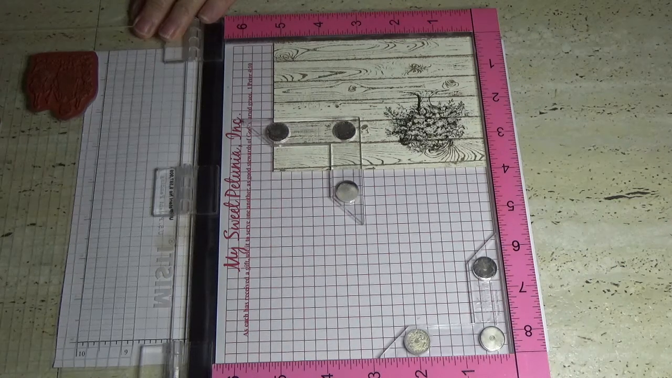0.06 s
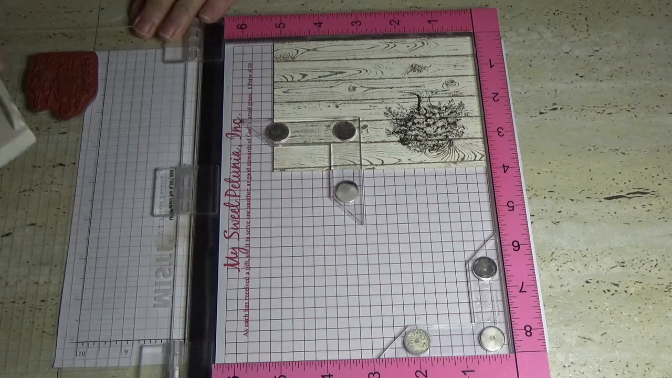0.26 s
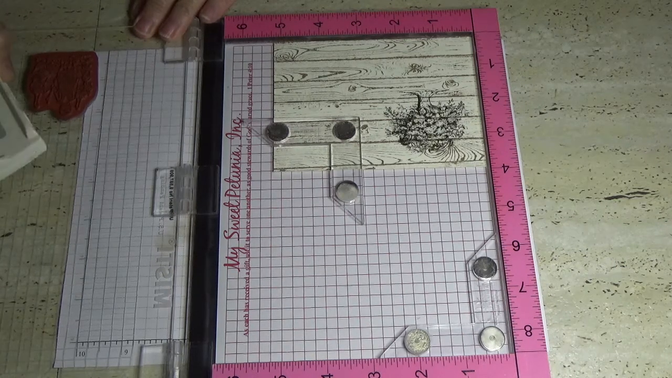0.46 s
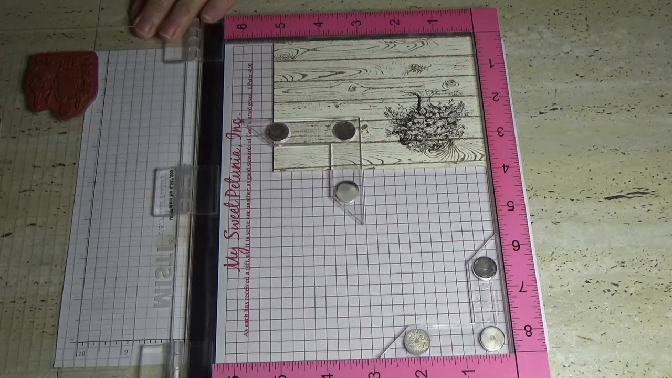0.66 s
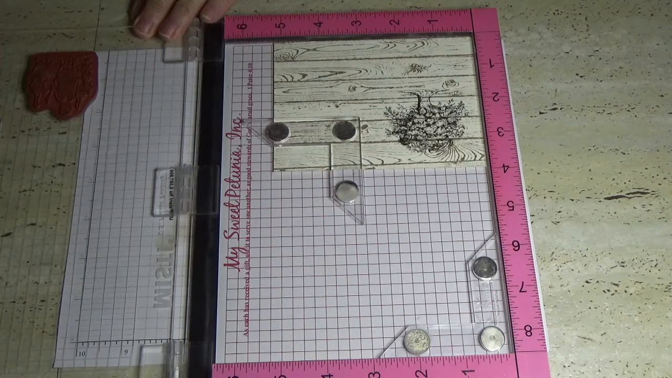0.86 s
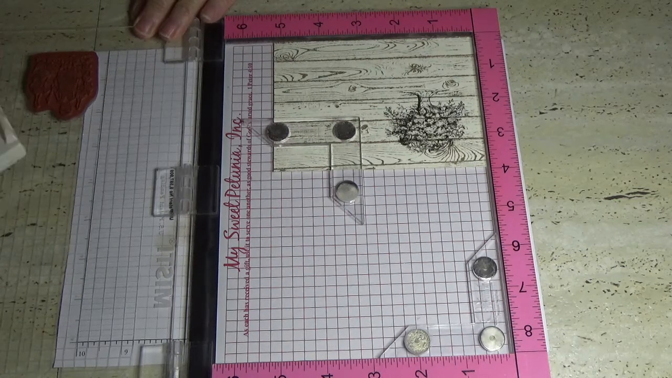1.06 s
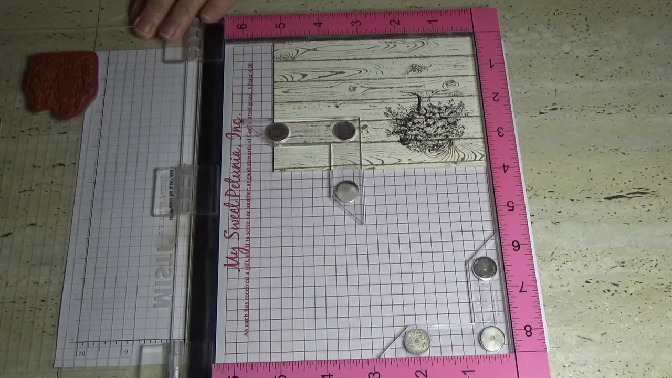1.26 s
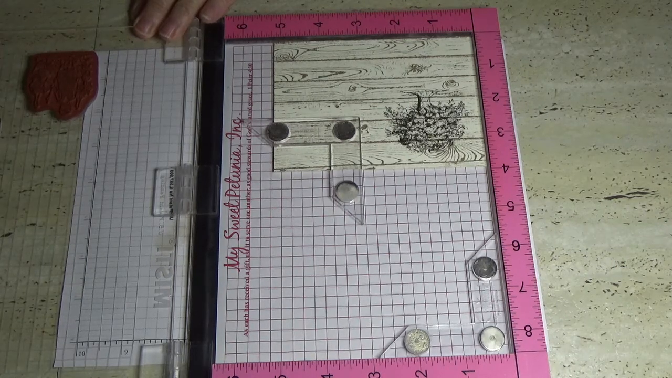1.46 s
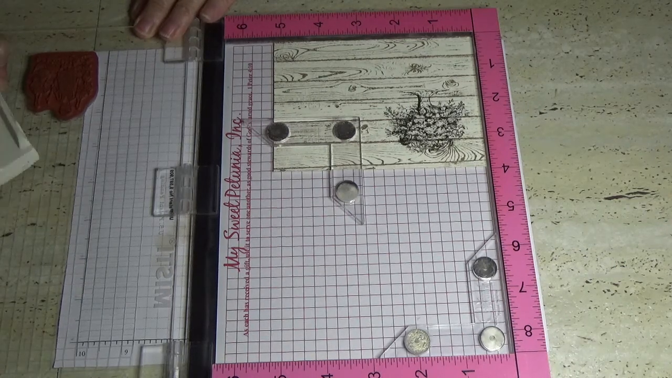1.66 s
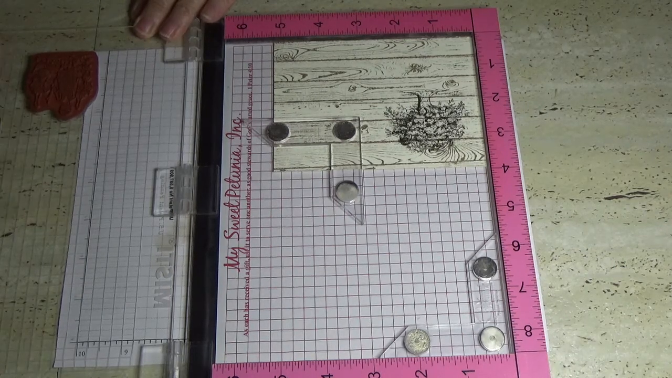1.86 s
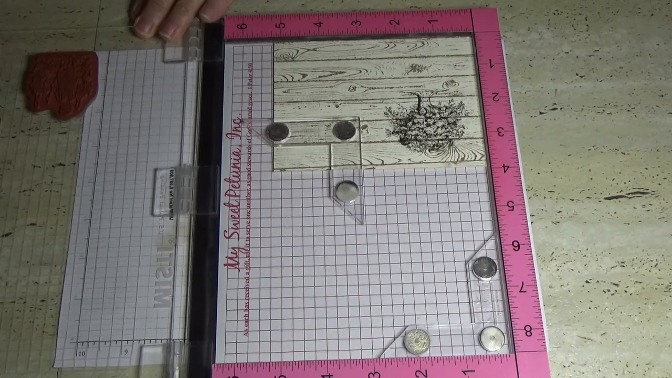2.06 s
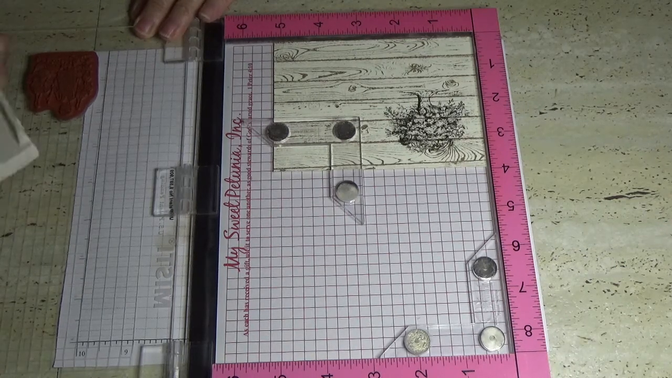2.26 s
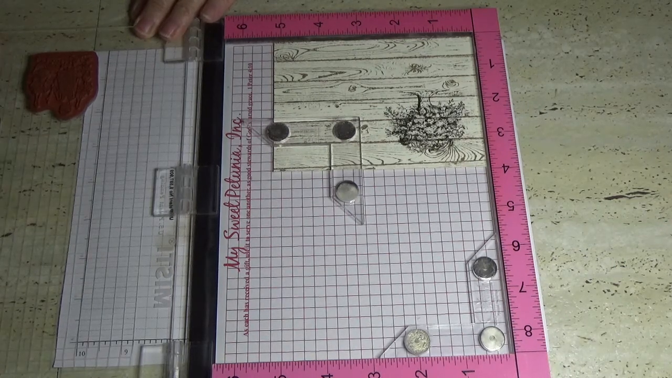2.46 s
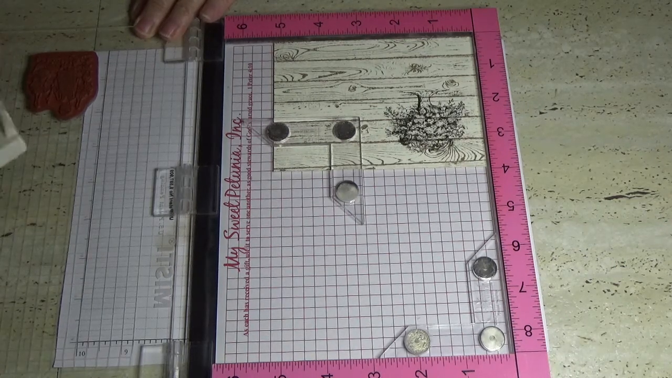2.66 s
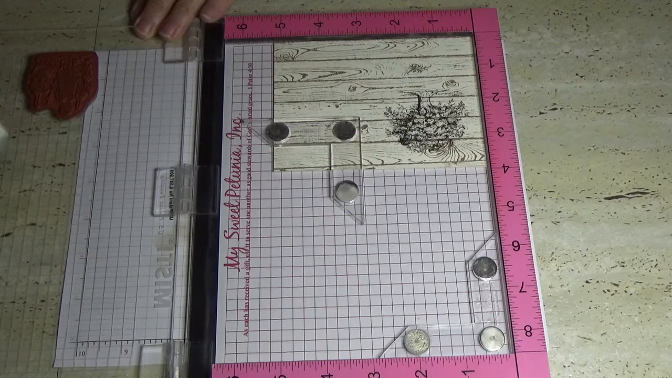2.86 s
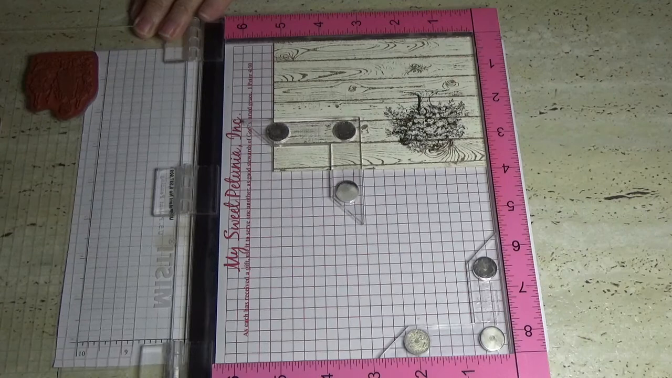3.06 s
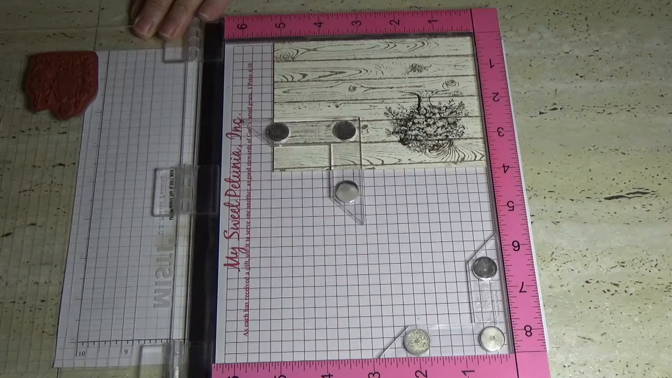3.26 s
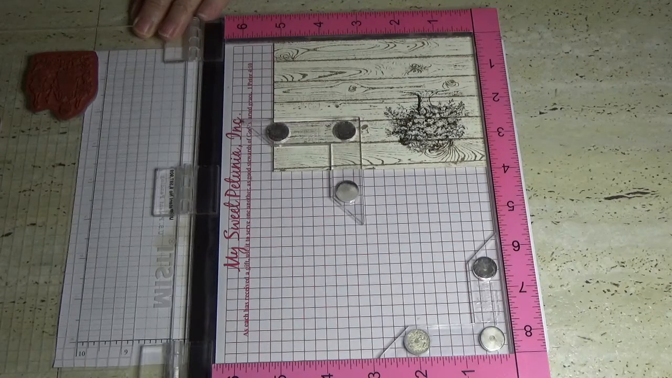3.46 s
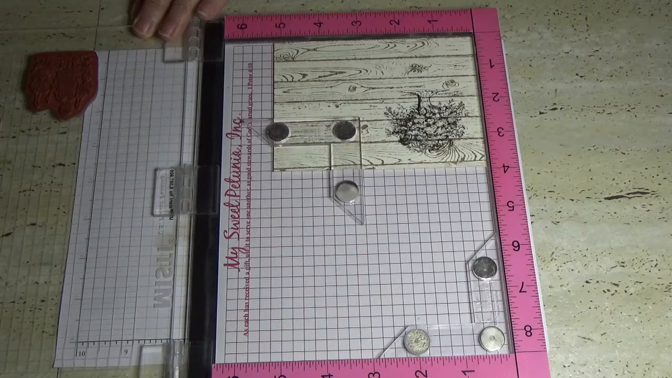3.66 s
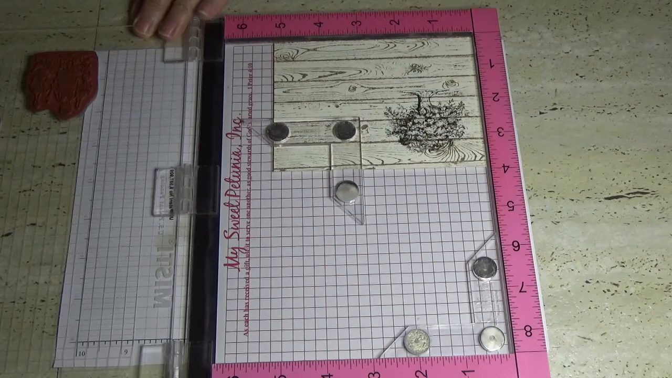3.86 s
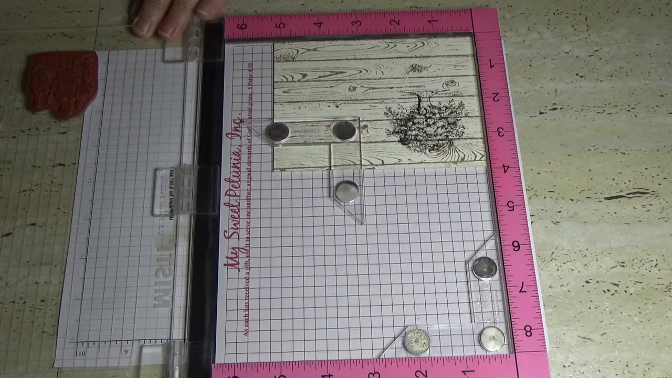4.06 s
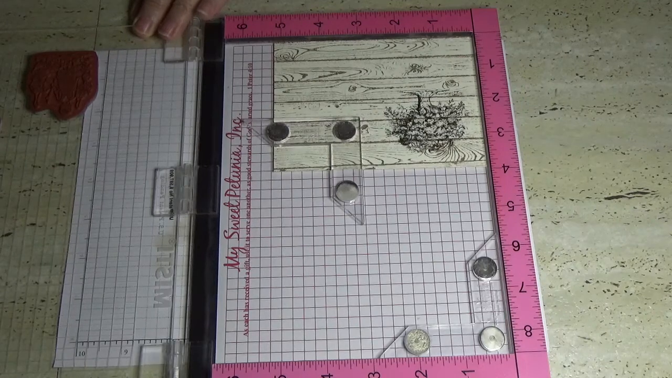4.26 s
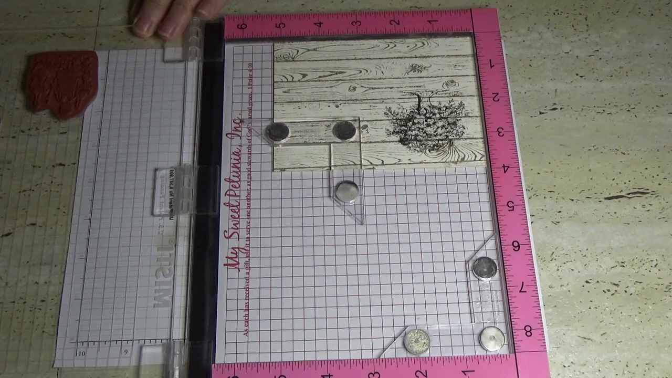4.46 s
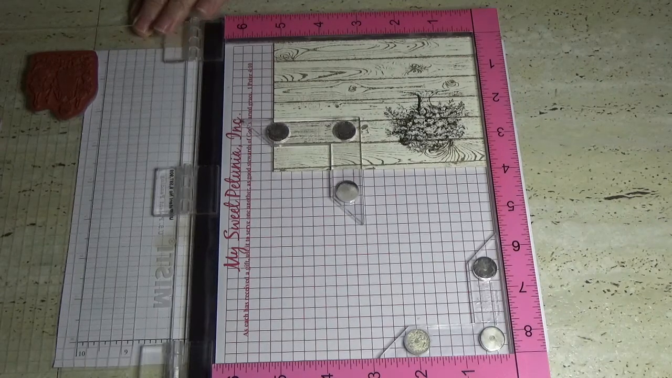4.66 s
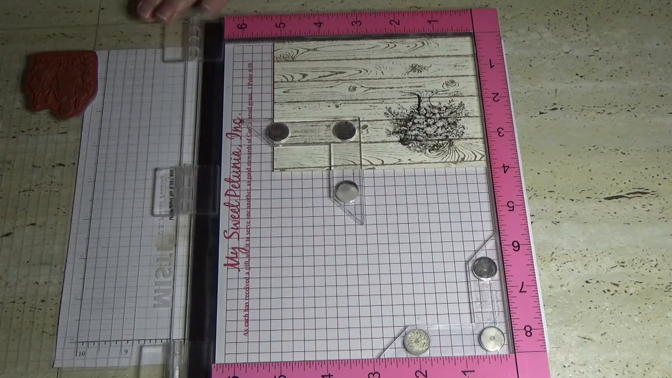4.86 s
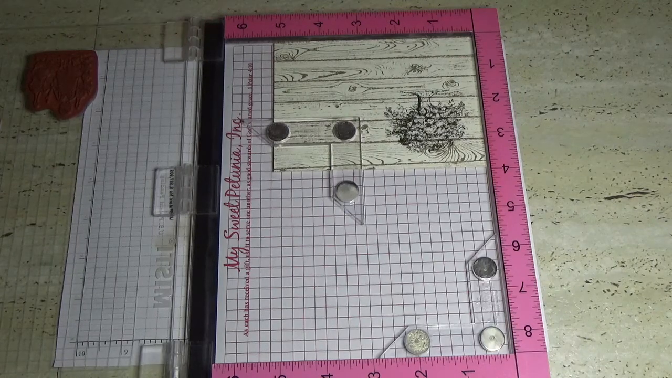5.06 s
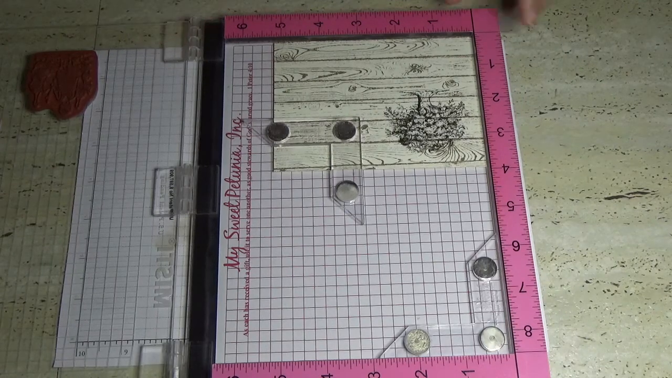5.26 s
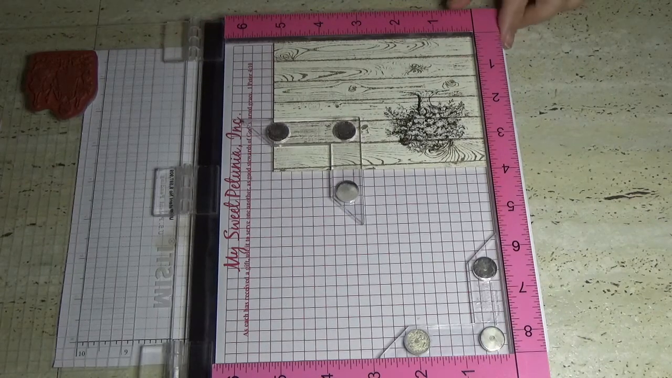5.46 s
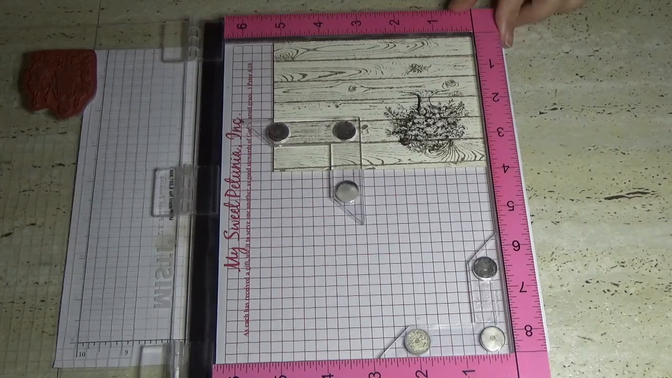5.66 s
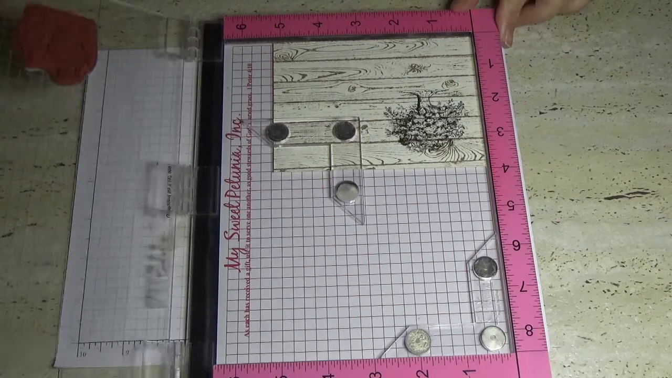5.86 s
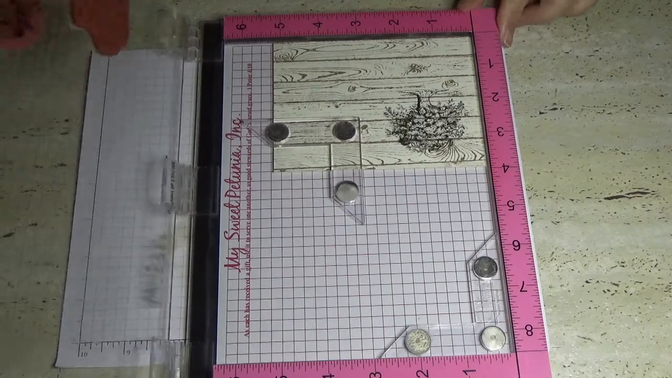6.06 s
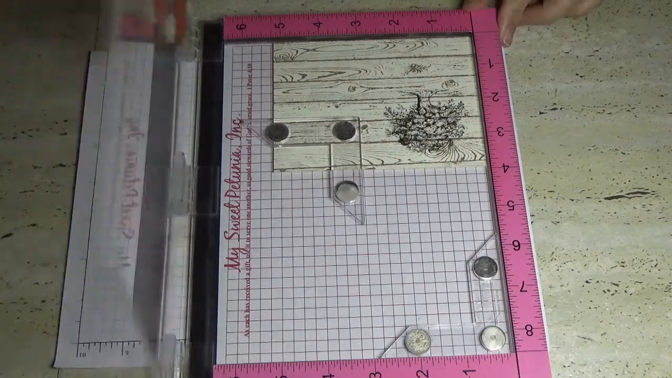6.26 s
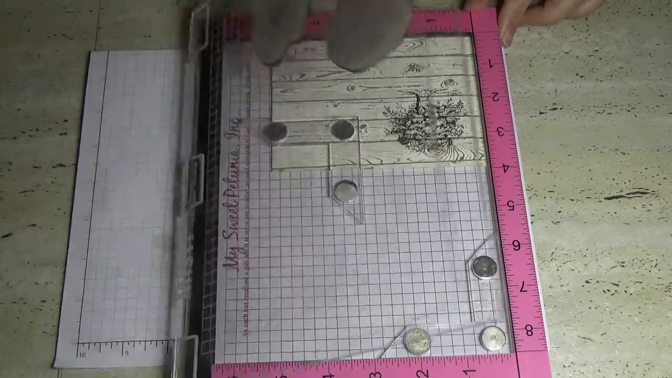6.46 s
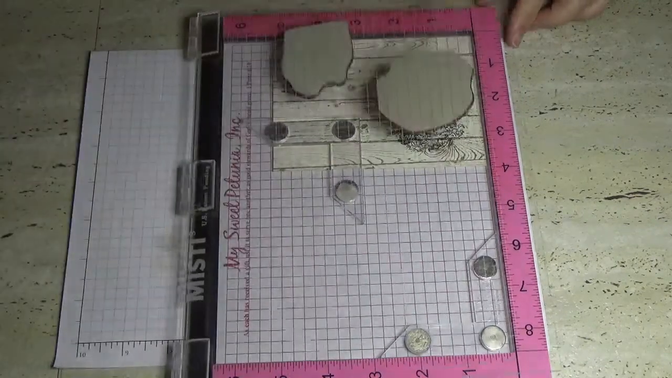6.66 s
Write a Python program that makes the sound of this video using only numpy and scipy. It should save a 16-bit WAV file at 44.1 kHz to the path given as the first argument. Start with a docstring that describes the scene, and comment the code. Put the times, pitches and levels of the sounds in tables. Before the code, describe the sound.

Close up in a small room, a plastic ink pad strikes a rubber stamp five times, about twice every 1.2 seconds, each crack booming through the table. Quieter hollow clacks follow as it pulls free. It is set down with a knock, a hand brushes faintly, small clicks follow, then a hinge creaks in a short raspy buzz. Soft hiss and faint hum lie beneath.

```python
"""In a small room, a plastic ink pad is tapped five times onto a rubber stamp on the open lid of a press.
Each tap cracks and shakes the table by modal vibration; the sticky pad pulls free with a hollow clack.
The pad is put down, fingers click on the press, and its hinge creaks by stick-slip friction as the lid
is swung shut. Blows ring damped modes over a noise burst; the creak is a train of ticks in resonators.
A decaying-noise echo answers them, over air hiss, a faint mains hum and a brushing hand."""
import sys
import numpy as np
from scipy import signal
from scipy.fft import rfft, irfft, next_fast_len
from scipy.io import wavfile

SR = 44100
rng = np.random.default_rng(int(sys.argv[2]) if len(sys.argv) > 2 else 0)


def master(y):
    """Save y as 16-bit WAV."""
    cut = np.clip(np.atleast_2d(y).T, -1, 1)
    pcm = np.round(cut * 32767)  # scale
    wavfile.write(sys.argv[1], SR, pcm.astype(np.int16))


N = 295911   # length of the scene in samples


def from_db(db):
    """Level definition: amplitude ratio of a level in dB."""
    return 10 ** (np.asarray(db) / 20)


def rms_one(x):
    """Normalisation to unit root-mean-square amplitude."""
    return x / np.sqrt(np.mean(x ** 2) + 1e-20)


def fade(t, t60):
    """Exponential damping: a loss of 60 dB in each t60."""
    return from_db(-60 * t / t60)


def at_hz(points, hz):
    """Spectral interpolation on a logarithmic frequency axis."""
    points = np.array(points)
    return np.interp(np.log(np.maximum(hz, 1)), np.log(points[:, 0]), points[:, 1])


def coloured(x, spectrum):
    """Linear filtering: a gain in dB applied at each frequency."""
    length = x.shape[-1]
    size = next_fast_len(length, real=True)
    gain = from_db(at_hz(spectrum, np.fft.rfftfreq(size, 1 / SR)))
    return irfft(rfft(x, size) * gain, size)[..., :length]


def band(x, low_hz, high_hz):
    """Band-pass filtering between two edges."""
    sos = signal.butter(2, [low_hz, high_hz], "band", fs=SR, output="sos")
    return signal.sosfilt(sos, x)


def add(track, s, sound):
    """Superposition: mix a sound into the track at time s."""
    start = int(s * SR)
    track[..., start:start + sound.shape[-1]] += sound[..., :N - start]


# spread of diffuse sound between two microphones: f/Hz, side re mid level/dB
STEREO_SPREAD = [(50, -20), (130, -13), (300, -7), (1000, -5.5), (3000, -5.5), (10000, -8.5)]


def diffuse(size):
    """Diffuse field: stereo white noise, alike in the bass and wider in the treble."""
    mid, side = rng.standard_normal((2, size))
    return mid + coloured(side, STEREO_SPREAD) * [[1], [-1]]


# edges of the five registers of a plastic knock, thud to crack: f/Hz
REGISTER_EDGES = [110, 430, 850, 1500, 4500, 12500]
PIVOT_HZ = 1100   # brightness tilts a blow about this frequency
# selectors that pick out one register
THUD, KNOCK, RING, CLACK, CRACK = np.eye(len(REGISTER_EDGES) - 1)


def octaves_above_pivot():
    """Logarithmic pitch scale: the middle of each register in octaves from the pivot."""
    edges = np.log2(np.array(REGISTER_EDGES) / PIVOT_HZ)
    return (edges[:-1] + edges[1:]) / 2


def knocks(events, voice, modes, crack_db, rise_s):
    """Modal excitation: each blow rings damped modes over a crack; harder contact tilts it to the treble.

    Events: t/s, level/dB, brightness/(dB/octave), pitch/semitones, crack t60/s.
    Returned rows: left, right, and what goes out into the room."""
    out = np.zeros((3, N))
    t = np.arange(SR // 6) / SR
    mode_hz, mode_db, mode_t60 = np.transpose(modes)[:, :, None]
    rise = 1 - np.exp(-t / rise_s)
    for s, blow_db, brightness, semitones, crack_t60 in events:
        # damped modes, each slightly varied in pitch and strength
        pitch = 2 ** (semitones / 12)
        detune, strength, phase = rng.standard_normal((3, len(modes), 1))
        height = from_db(mode_db + 1.5 * strength) * fade(t, mode_t60)
        angle = 2 * np.pi * (pitch * mode_hz * (1 + 0.015 * detune) * t + phase)
        rings = (height * np.sin(angle)).sum(0)

        burst = rise * fade(t, crack_t60)
        crack = from_db(crack_db) * diffuse(len(t)) * burst
        # summed over all directions the crack has the even spectrum of one click
        all_round = np.linalg.norm(crack[0]) * (burst == burst.max())
        blow = rings * rise + np.vstack([crack, all_round])

        register_db = blow_db + np.array(voice) + brightness * octaves_above_pivot()
        registers = zip(REGISTER_EDGES, REGISTER_EDGES[1:], register_db)
        for k, (low_hz, high_hz, db) in enumerate(registers):
            part = band(blow, low_hz, high_hz)
            # the level of a register holds over its first 20 ms
            part = part / np.std(part[:, :SR // 50], axis=1, keepdims=True)
            polarity = (-1) ** k   # neighbouring registers are opposed
            add(out, s, polarity * from_db(db) * part)
    return out


# pad meets stamp, twice grazing it first: t/s, level/dB, brightness/(dB/octave),
# clack of the rim/dB, pitch shift/semitones, weight of the hand/dB
TAPS = [(0.3398, -51.5, -3, -12, 0.48, 8), (.3443, -32, 1, 1, -0.31, -3.5),
        (1.0022, -33, 0.28, 4, -0.31, 0), (1.6328, -27, -1.5, -2, -0.4, -2),
        (2.216, -50.5, -4.5, -4, -0.32, 4), (2.2254, -29.5, 0.43, 2.5, 0.28, -4),
        (2.732, -31, 0.3, 1.5, 0.96, 6)]
# modes of the pad case: f/Hz, relative level/dB, t60/s
PAD_MODES = [(237, -19.5, 0.061), (308, -15.5, 0.1), (377, -16, 0.054), (543, -8.5, 0.049),
             (656, -3, 0.035), (814, -12, 0.11), (926, 1.5, 0.012), (1034.6, -7.5, 0.13), (1097, 6, 0.025),
             (1363, -6, 0.018), (1730, -1, 0.021), (2280, -8.5, 0.022), (2400, 8.5, 0.013),
             (3267, -4, 0.024), (3825, -16, 0.093), (4474, 0.5, 0.01)]
# share of a tap in thud, knock, ring, clack and crack: relative level/dB
TAP_VOICE = [-13, -4.5, -1.5, 1, -3]
TAP_CRACK_T60_S = 0.013


def pad_taps():
    """Impact of the pad case on the stamp: short and hard, clacking on its rim, thudding under a heavy hand."""
    blows = []
    for s, db, brightness, clack_db, semitones, weight_db in TAPS:
        level_db = db + clack_db * CLACK + weight_db * THUD
        blows.append((s, level_db, brightness, semitones, TAP_CRACK_T60_S))
    return knocks(blows, TAP_VOICE, PAD_MODES, crack_db=17, rise_s=0.00097)


# deep table modes, in close pairs that beat (sway, then drum): lower f/Hz, upper f/Hz, t60/s
TABLE_PAIRS = [(58, 70.5, .42), (133, 149, .22)]
SWAY_DB, DRUM_DB = -11, -8.5   # amplitude of each mode against tap level plus hand weight


def table_boom():
    """Beating: a tap sways and drums the table; paired modes start opposed, so the boom swells and throbs."""
    out = np.zeros(N)
    t = np.arange(SR // 2) / SR
    boom = 0
    for (lower_hz, upper_hz, t60), mode_db in zip(TABLE_PAIRS, [SWAY_DB, DRUM_DB]):
        pair = np.sin(2 * np.pi * lower_hz * t) - np.sin(2 * np.pi * upper_hz * t)
        boom = boom + from_db(mode_db) * fade(t, t60) * pair
    for s, db, *_, weight_db in TAPS:
        add(out, s, from_db(db + weight_db) * boom)
    return out


# pad pulls free and rattles in its case: t/s, level/dB, brightness/(dB/octave),
# hollow ring/dB, pitch shift/semitones
LIFTS = [(0.517, -32, 0.8, -1.5, 1.34), (0.6929, -44.5, -2, -6, 3.5), (1.165, -33, -0.3, -0.5, 0.35),
         (1.39, -45.5, -1.3, -4, 5), (1.808, -34, 1.5, 6, 0.4), (2.389, -49, -4.5, 4, -0.5),
         (2.3977, -39, -1.7, -0.5, 0.87), (2.8268, -41, 2.2, 4.5, 0)]
# share of a lift in thud, knock, ring, clack and crack: relative level/dB
LIFT_VOICE = [-21.5, -15.5, -1, -3, -24.5]
LIFT_CRACK_T60_S = 0.021


def pad_lifts():
    """Sudden release of adhesion: the sticky pad lets go and its case rings hollow in its modes."""
    blows = []
    for s, db, brightness, ring_db, semitones in LIFTS:
        blows.append((s, db + ring_db * RING, brightness, semitones, LIFT_CRACK_T60_S))
    return knocks(blows, LIFT_VOICE, PAD_MODES, crack_db=11, rise_s=0.0006)


# things set down and nudged on the table, the last thump sinking in pitch:
# t/s, level/dB, brightness/(dB/octave), pitch shift/semitones, crack t60/s
BUMPS = [(3.4206, -39, 3.9, .5, 0.013), (3.429, -41.5, 3, 0.6, 0.055), (4.579, -50.5, 1.5, 0, 0.051),
         (4.595, -57.5, -3, .5, 0.043), (5.154, -65, -8, 3, .05), (5.172, -82.5, -16, -2.5, 0.028),
         (5.194, -85.5, -13, -3, .021)]
# modes of the table top under a soft bump: f/Hz, relative level/dB, t60/s
TOP_MODES = [(150.5, 0, 0.054), (190, -11.5, 0.18), (269, -0.5, 0.036), (349, -3, 0.039), (523, 1, 0.13),
             (633, 12.5, 0.013), (834, 0.5, 0.033), (885, -4.5, 0.025), (1360, -7.5, 0.018),
             (1900, -12, 0.028)]
# share of a bump in thud, knock, ring, clack and crack: relative level/dB
BUMP_VOICE = [-3.5, -10, 3, -12, -31]


def table_bumps():
    """Plate modes: soft blows on the table top, whose pitch depends on where they land."""
    return knocks(BUMPS, BUMP_VOICE, TOP_MODES, crack_db=1.0, rise_s=0.00077)


# light clicks and scuffs of fingers and lid on the press: t/s, level/dB,
# brightness/(dB/octave), clack of the frame/dB, crack t60/s
CLICKS = [(3.1022, -79.5, 2.5, 0, 0.03), (4.7677, -60.5, 1.5, -3.5, 0.036), (4.843, -81.5, 4.5, -1, 0.015),
          (5.1636, -66, 2.8, 2.5, 0.021), (5.374, -53, -7, 7, 0.048), (5.5778, -80.5, 6, -29, 0.021),
          (5.68, -60, 2, 1, 0.015), (5.6938, -75, 6.5, -9, 0.019), (5.71, -54.5, -2.5, -5, 0.039),
          (5.719, -54, -4, 3.5, 0.041), (6.1591, -53.5, 2, -3.5, 0.011), (6.2832, -63, 2.5, 0, .01)]
# modes of the press frame and lid: f/Hz, relative level/dB, t60/s
PRESS_MODES = [(831, -15.5, 0.29), (1122, -16, 0.1), (1616, -14.5, 0.088), (2140, -15, 0.063),
               (4550, 8.5, 0.0074), (10460, 5.5, 0.011)]
# share of a click in thud, knock, ring, clack and crack: relative level/dB
CLICK_VOICE = [-28, -11.5, -4, 6.5, 4]


def press_clicks():
    """Impulsive contact: small sharp clicks on the frame and lid, which keep their pitch."""
    blows = []
    for s, db, brightness, clack_db, crack_t60 in CLICKS:
        blows.append((s, db + clack_db * CLACK, brightness, 0, crack_t60))
    return knocks(blows, CLICK_VOICE, PRESS_MODES, crack_db=10, rise_s=0.000096)


def resonate(x, resonances):
    """Parallel resonance: band-pass resonators side by side."""
    out = 0
    for hz, width_hz, db in resonances:
        r = np.exp(-np.pi * width_hz / SR)   # pole radius
        zeros = np.array([1, 0, -1]) * (1 - r * r) / 2
        poles = [1, -2 * r * np.cos(2 * np.pi * hz / SR), r * r]
        out = out + from_db(db) * signal.lfilter(zeros, poles, x + 1e-18)
    return out


# in its long pull the hinge locks into an even buzz (slip rate in Hz, spread of log interval)
STEADY_SLIP_HZ, STEADY_JITTER = 191.7, 0.0028
# the hinge gives way in pulls, each lasting until the next: t/s, level/dB, squeal level/dB,
# first slip rate f/Hz, last slip rate f/Hz, irregularity (standard deviation of log interval)
PULLS = [(5.927, -45.5, -60, 309.3, 397, 0.23),
         (5.957, -45.5, -51, STEADY_SLIP_HZ, STEADY_SLIP_HZ, STEADY_JITTER),
         (6.088, -48, -46, 134.3, 222.8, .025), (6.207, -61, -49.5, 367, 403, 0.3),
         (6.28, -52, -47, 379.4, 337.8, .12)]
# resonances that the hinge excites: f/Hz, width/Hz, relative level/dB
CREAK_BODY = [(710, 340, 10), (1150, 340, 5.5), (1730, 210, 7.5)]
CREAK_RASP = [(2600, 260, -2.5), (3330, 450, 1), (3980, 500, -21), (5370, 840, 7.5), (6600, 290, -10)]
CREAK_SQUEAL = [(4160, 780, 3.5), (5010, 110, 10.5)]
CREAK_FIZZ = [(9250, 1000, 0.54), (9700, 11000, -1.5)]
CREAK_END_S, CREAK_RELEASE_S, CREAK_RELEASE_DB = 6.385, 0.06, 44
BODY_DB, RASP_DB, FIZZ_DB = -3, -1.5, 3   # against the level of a pull
# lost over a pull as the friction eases
BODY_SAG_DB, RASP_SAG_DB, SQUEAL_SAG_DB, FIZZ_SAG_DB = 4.5, 4, 3.5, 19


def hinge(uneven_db):
    """Stick-slip friction: each pull is a train of ticks that starts strong and sags while its rate glides."""
    ticks = np.zeros(N)
    levels_db = np.zeros((4, N))   # body, rasp, squeal, fizz
    sag_db = [BODY_SAG_DB, RASP_SAG_DB, SQUEAL_SAG_DB, FIZZ_SAG_DB]
    starts = [pull[0] for pull in PULLS]
    ends = starts[1:] + [CREAK_END_S]
    for (start, db, squeal_db, first_hz, last_hz, ragged), end in zip(PULLS, ends):
        s = start
        for late, strength in rng.standard_normal((60, 2)):
            if s < end:
                rate = np.interp(s, [start, end], [first_hz, last_hz])
                # quick slips release less each
                ticks[int(s * SR)] = from_db(uneven_db * strength) / np.sqrt(rate)
                s += np.exp(late * ragged) / rate
        first = int(start * SR)
        progress = np.minimum(np.arange(N - first) / SR / (end - start), 1)
        onset_db = np.array([db + BODY_DB, db + RASP_DB, squeal_db, db + FIZZ_DB])
        levels_db[:, first:] = onset_db[:, None] - np.outer(sag_db, progress)

    # the treble dies first as the lid comes to rest
    release_s = [CREAK_END_S - CREAK_RELEASE_S, CREAK_END_S]
    levels_db[1:] -= np.interp(np.arange(N) / SR, release_s, [0, CREAK_RELEASE_DB])

    out = 0
    creaking = slice(int(starts[0] * SR), int(CREAK_END_S * SR))
    for resonances, db in zip([CREAK_BODY, CREAK_RASP, CREAK_SQUEAL, CREAK_FIZZ], levels_db):
        part = resonate(ticks, resonances)
        out = out + from_db(db) * part / np.std(part[creaking])
    return out


# decay of the room's echo: f/Hz, t60/s
ROOM_T60 = [(100, 0.67), (400, 0.51), (1000, 0.3062), (3000, 0.364), (6000, 0.4), (11000, 0.32)]
# spectrum of the room's echo, before each source's own echo gain: f/Hz, level/dB
ROOM_SPECTRUM = [(100, -3), (400, -6), (1000, -3.5), (2500, -5), (5000, -9), (10000, -5)]


def room(first_echo_s):
    """Reverberation: dense reflections that build up within milliseconds and die band by band."""
    t = np.arange(SR // 2) / SR
    noise = rfft(diffuse(len(t)))
    hz = np.fft.rfftfreq(len(t), 1 / SR)
    build_up = 1 - np.exp(-(t / first_echo_s) ** 2)
    tail = 0
    for centre_hz, t60 in ROOM_T60:
        # overlapping bands that crossfade between neighbouring centres
        share = at_hz([(other_hz, other_hz == centre_hz) for other_hz, _ in ROOM_T60], hz)
        decay = fade(t, t60) * build_up
        tail = tail + irfft(noise * share, len(t)) * decay / np.linalg.norm(decay)
    return coloured(tail, ROOM_SPECTRUM)


def heard(source, echo, wet_db):
    """Convolution: direct sound plus its echo from the room."""
    reflected = signal.oaconvolve(source[2:], echo, axes=1)[:, :N]
    return source[:2] + from_db(wet_db) * reflected


# spectrum of room air and microphone hiss: f/Hz, relative level per Hz/dB
AIR_SPECTRUM = [(12, -29), (25, -13), (45, -5.5), (70, -9), (125, -9.5), (220, -10.5), (444, -14),
                (800, -16), (1200, -18), (2160, -21), (11000, -29.5)]
AIR_DB = -62.5
HUM_HZ, HUM_DB = 100, -71
# spectrum of the brushing hand: f/Hz, relative level per Hz/dB
BRUSH_SPECTRUM = [(200, -8), (850, 7.5), (1700, 5), (3500, -6), (10000, -7)]
# strokes of a hand brushing about: middle t/s, level added to the resting hand/dB
STROKES = [(3.15, -71), (3.77, -66.5), (4.01, -69), (4.24, -62.5), (4.55, -68.5), (6.68, -64.5)]
STROKE_WIDTH_S, RESTING_HAND_DB = 0.078, -73   # width: from the middle to 1/e of its amplitude


def background():
    """Stationary noise and a hum tone, with a hand whose brushing swells and fades with each stroke."""
    t = np.arange(N) / SR
    air = from_db(AIR_DB) * rms_one(coloured(diffuse(N), AIR_SPECTRUM))
    hum = from_db(HUM_DB) * rms_one(np.sin(2 * np.pi * HUM_HZ * t))
    motion = from_db(RESTING_HAND_DB)
    for s, db in STROKES:
        motion = motion + from_db(db) * np.exp(-((t - s) / STROKE_WIDTH_S) ** 2)
    brushing = motion * rms_one(coloured(diffuse(N), BRUSH_SPECTRUM))
    return air + hum + brushing


def panned(x, balance):
    """Interchannel level difference: left and right tilted against each other."""
    half = np.array(balance) / [1, 2]   # half the difference to each side
    return np.array([coloured(x[0], half), coloured(x[1], half * [1, -1])])


# the pad is worked off to the left: f/Hz, left minus right level/dB
PAD_BALANCE = [(200, 1), (550, 1), (1000, -.6), (2000, 0), (9000, 1)]


def scene():
    """Superposition of pad, table and press, heard close by in the small room."""
    echo = room(first_echo_s=0.0023)
    taps = heard(pad_taps(), echo, wet_db=1.54)
    lifts = heard(pad_lifts(), echo, wet_db=-0.5)
    bumps = heard(table_bumps(), echo, wet_db=2.5)
    clicks = heard(press_clicks(), echo, wet_db=1.5)
    creak = heard(np.tile(hinge(uneven_db=1.9), (3, 1)), echo, wet_db=5.0)
    pad_and_table = panned(taps + lifts + bumps, PAD_BALANCE)
    return pad_and_table + clicks + creak + table_boom() + background()


CUTOFF_HZ = 11000


def record(dry):
    """Band limitation: the recorder cuts the top steeply."""
    sos = signal.ellip(10, 0.2, 70, CUTOFF_HZ, fs=SR, output="sos")   # ripple and stopband in dB
    return signal.sosfilt(sos, dry)


dry = scene()
out = record(dry)
master(out)
```